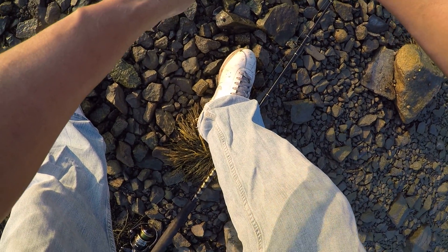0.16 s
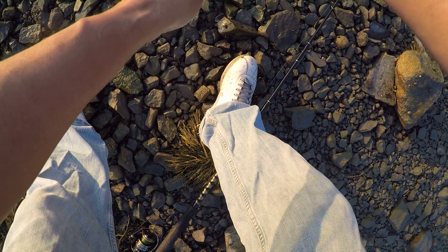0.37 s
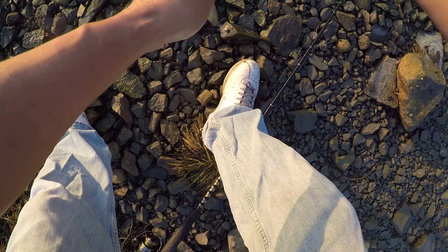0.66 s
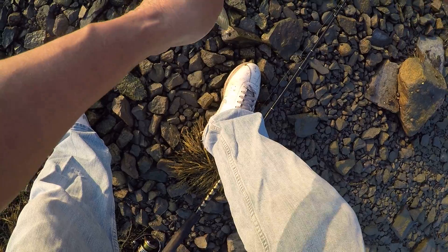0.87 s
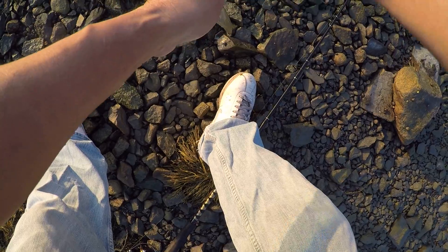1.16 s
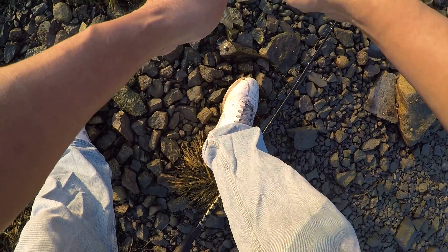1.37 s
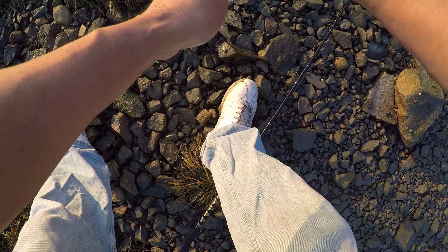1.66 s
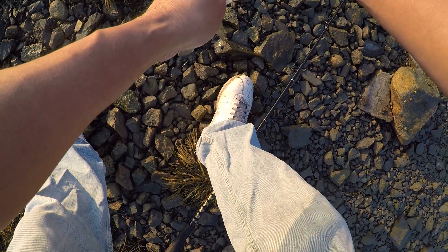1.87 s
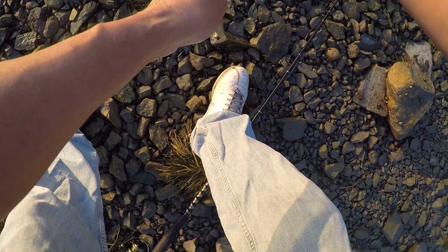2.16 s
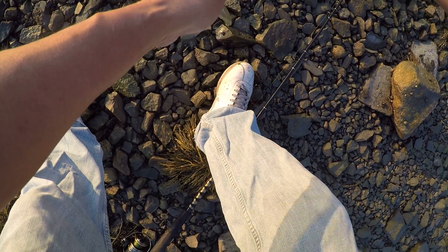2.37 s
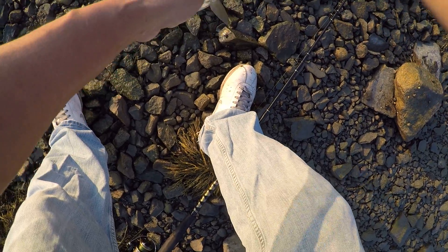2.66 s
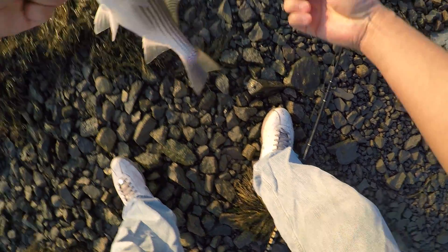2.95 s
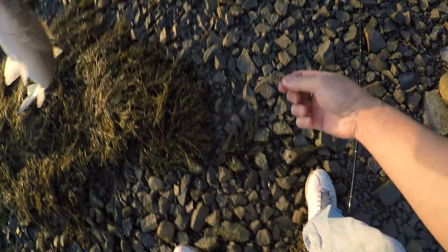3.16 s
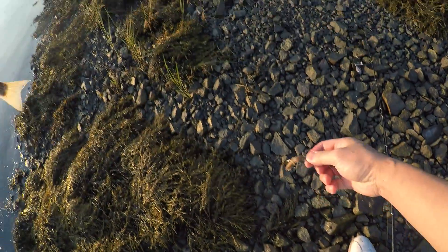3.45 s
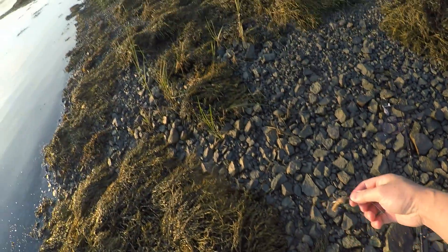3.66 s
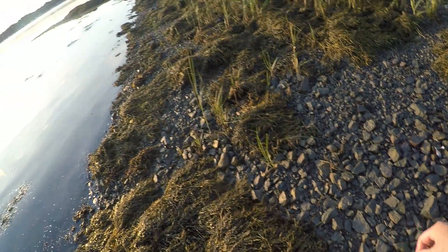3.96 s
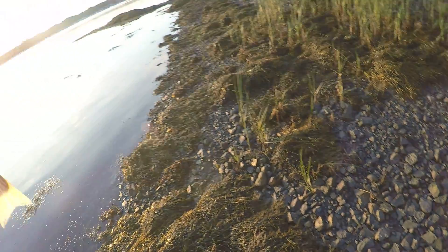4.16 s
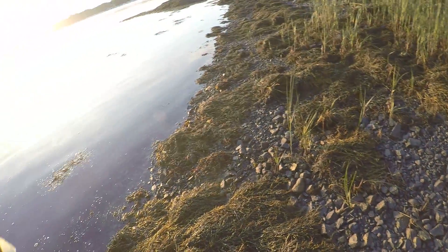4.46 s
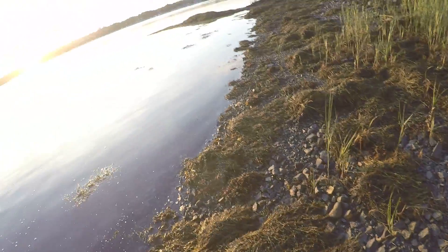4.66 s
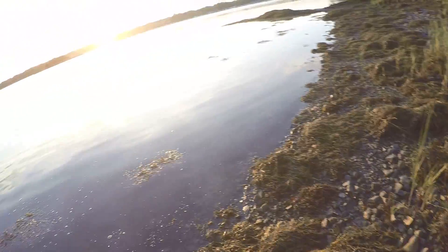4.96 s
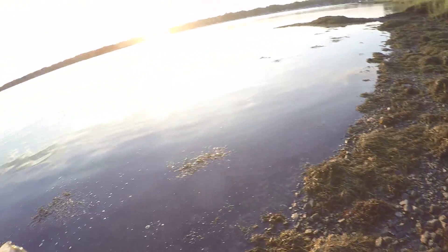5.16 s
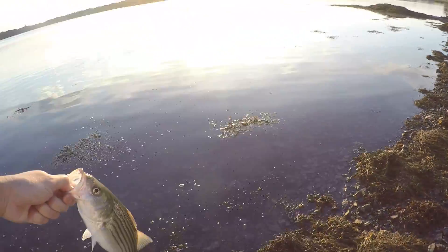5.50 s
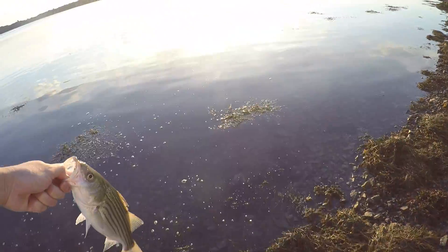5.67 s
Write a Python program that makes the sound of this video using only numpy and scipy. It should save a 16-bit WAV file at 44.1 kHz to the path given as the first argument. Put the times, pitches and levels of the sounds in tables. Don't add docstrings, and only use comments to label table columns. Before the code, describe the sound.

Muffled low rumble and faint gravel inside a sealed camera case, with hollow plastic knocks and creaks, then a short squeaky scrape near the end.

```python
import sys
import numpy as np
from scipy import signal
from scipy.fft import rfft, irfft, next_fast_len
from scipy.io import wavfile
from scipy.ndimage import uniform_filter1d, map_coordinates

SR = 44100
rng = np.random.default_rng(int(sys.argv[2]) if len(sys.argv) > 2 else 0)


def master(y):
    cut = np.clip(np.atleast_2d(y).T, -1, 1)
    pcm = np.round(cut * 32767)
    wavfile.write(sys.argv[1], SR, pcm.astype(np.int16))


def rack_gain(trim_db):
    fader = np.asarray(trim_db, float)
    return 10 ** (fader / 20)


N = 257103


def unit(x):
    return x / np.sqrt(np.mean(x ** 2) + 1e-20)


def curves(rows):
    s, *columns = np.transpose(rows)
    return [np.interp(np.arange(N) / SR, s, column) for column in columns]


def wobble(rate):
    knots = rng.standard_normal(int(N * rate / SR) + 4)
    return map_coordinates(knots, [np.arange(N) * rate / SR])


def filtered(x, response):
    size = next_fast_len(N + 8192)
    return irfft(rfft(x, size) * response(np.fft.rfftfreq(size, 1 / SR)), size)[:N]


def noise(points):
    hz, db = np.transpose(points)
    return unit(filtered(rng.standard_normal(N), lambda f: rack_gain(np.interp(np.log(f + 1), np.log(hz + 1), db))))


def add(track, s, sound):
    at = max(round(s * SR), 0)
    track[at:at + len(sound)] += sound[:len(track) - at]


def through(modes, x, tilt):
    def response(f):
        body = 0
        for k, (centre, width, db) in enumerate(modes):
            loss = 1j * f * width
            body = body + (-1) ** k * rack_gain(db) * loss / (centre * centre - f * f + loss)
        return body * ((f + 1) / 1700) ** tilt / (1 + (f / 7500) ** 4)
    return unit(filtered(x, response))


def heard(modes, source, level_db, bright_db):
    dull = through(modes, source, tilt=-0.41)
    bright = through(modes, source, tilt=3.13)
    return rack_gain(level_db) * (dull + rack_gain(bright_db) * bright)


# f/Hz, level/dB per Hz
HISS_SPECTRUM = [(180, -42), (300, -19), (372, -8.5), (968, -6), (1140, -2.5), (2610, -12.5), (4280, -12.5),
                 (15500, -23)]


def hiss():
    return rack_gain(-65) * noise(HISS_SPECTRUM)


# t/s, effort of feet and cloth/dB, hardness of rubbing/dB, air past the case/dB
MOVEMENT = [(0, -65.5, -10, -73), (.6, -68.5, 0, -69.5), (1.3, -66.5, -7, -68), (2.1, -68, -6, -69.5),
            (2.75, -65.5, -4, -65.5), (3.1, -59.5, -3, -68), (3.38, -61.5, 1, -60.5), (3.52, -59, 3, -53),
            (3.82, -56, -5, -56.5), (3.96, -61, -4, -61.5), (4.3, -62.5, -5, -59.5),
            (4.71, -57.5, -0.5, -56.5), (4.9, -58, -6, -57.5), (5.06, -64, 8, -56.5),
            (5.3, -62.5, -7, -60.5), (5.4, -48.5, 4.5, -58), (5.55, -61.5, -8, -64), (5.83, -61, 3, -67)]
# f/Hz, width/Hz, level/dB
CASE_BODY = [(580, 810, -16.5), (1200, 393, -5), (1735, 232, -4), (2235, 230, -5.5), (2770, 320, -9.5),
             (3500, 480, -15), (4210, 910, -22), (6000, 2400, -46)]
# f/Hz, width/Hz
CAVITY_MODE = (1734, 237)


def gravel():
    level_db, bright_db, hum_db = curves(MOVEMENT)
    chance = 1200 / SR * rack_gain(5.5 * wobble(35))
    draw = rng.random((3, N))
    size = rack_gain(1.3 * np.minimum(-np.log(draw[1] + 1e-9), 3))
    grains = (draw[0] < chance) * size * np.sign(draw[2] - 0.5)
    source = unit(grains) + 1.08 * rng.standard_normal(N)
    centre, width = CAVITY_MODE
    hum = filtered(rng.standard_normal(N), lambda f: 1 / (1 + (2 * (f - centre) / width) ** 2))
    level_db = level_db + 1.4 * wobble(21.765)
    bright_db = bright_db - 11.0 + 0.69 * wobble(22)
    return heard(CASE_BODY, source, level_db, bright_db) + rack_gain(hum_db) * unit(hum)


def push(hz, cycles, lean, edge):
    turns = np.arange(-round(SR / hz * 2), round(SR / hz * 3)) * hz / SR
    drop = edge * np.cos(2 * np.pi * 2.28 * turns + 0.86) * np.exp(-((turns - 0.25) / 0.49) ** 2)
    bell = np.exp(-((turns - lean * cycles) / (1.05 * cycles)) ** 2)
    return -np.cos(2 * np.pi * turns) * bell - drop


# t/s, peak
# level/dB, sharpness/dB, thud level/dB, kind of slip
SLIPS = [(1.319, -58, -3, -49, "scuff"), (1.5156, -15, -15.5, -29, "knock"),
         (3.1431, -14.5, -27, -35, "creak"), (3.2252, -11, -28.5, -32, "creak"),
         (3.2585, -16, -21, -30, "catch"), (3.2825, -16.5, -22, -36, "catch"),
         (3.3665, -15.5, -25, -34, "ratchet"), (3.4254, -15, -21.5, -28.5, "ratchet"),
         (3.5, -16.5, -22.5, -35, "ratchet"), (3.542, -16, -19, -33.5, "ratchet"),
         (3.6457, -17.5, -15, -38, "loose"), (3.7054, -18.5, -18.5, -36.5, "loose"),
         (3.816, -15, -15, -37.5, "crack"), (4.7425, -44, 0, -48, "brush"), (4.826, -12, -17, -27, "slam"),
         (4.8286, -20, -34, -46, "rebound"), (4.9467, -48, -6, -47, "brush"),
         (5.3258, -17.5, -11, -28.5, "jolt"), (5.3289, -24.5, -30, -55, "chatter"),
         (5.3446, -20, -17.5, -31, "jolt"), (5.4672, -27.5, -6, -33, "scuff"),
         (5.4758, -32.5, -9, -31.5, "drag"), (5.4833, -36, -6, -36, "drag"), (5.4884, -38, -8, -47, "drag"),
         (5.4912, -36, -4, -35, "grind"), (5.3469, -31, -23, -55, "chatter"), (5.431, -55, -8, -55, "drag"),
         (5.442, -51, -1, -50, "drag"), (5.509, -61, -10, -53, "drag"), (5.7436, -40.5, -9, -45, "brush")]
SLIP_KINDS = {"creak": (-21, -25.5, -21, -14.5, 200), "ratchet": (-19.5, -25, -14.5, -12, 180),
              "loose": (-23, -27.5, -17, -14.5, 168), "knock": (-17, -14, -22, -12, 138.5),
              "jolt": (-11, -19, -17.5, -24, 157), "slam": (-16.5, -11, -17.5, -10, 167),
              "rebound": (-11, -10, 0.5, -12.5, 190), "chatter": (-10, -17, 1.5, -9, 189),
              "scuff": (-5, -17, -4, -8, 156), "brush": (-19, -5, -3, -13, 207),
              "catch": (-17.5, -22, -15, -10, 191), "crack": (-31, -24, -18, -17.5, 183),
              "grind": (-11, -9, -4, -9, 160), "drag": (-3, -12, -0.5, -21, 147.5)}
# t/s, tick level/dB, thud level/dB, thud f/Hz
CHEST_BUMPS = [(3.058, -31, -43.5, 192), (3.337, -41, -34, 105), (3.5715, -44, -38, 112),
               (3.697, -46, -41.5, 104), (3.8009, -50, -39.5, 122), (3.9036, -25, -39.5, 106),
               (4.0022, -26.5, -38.5, 116), (4.0716, -29, -35.5, 114), (4.1065, -29, -36.5, 122),
               (4.15, -32, -39.5, 114), (4.1995, -35, -39, 108), (4.236, -24, -33, 106),
               (4.3241, -34, -41, 226), (4.397, -48, -49, 116), (5.358, -52, -34, 192),
               (5.61, -32, -45.5, 220), (5.641, -52, -56, 248), (5.721, -50, -52, 242),
               (5.752, -50, -49, 248), (5.773, -27, -41, 217), (5.812, -27, -40.5, 222)]
# t/s,
# depth level/dB, f/Hz, length/cycles
CHEST_HEAVES = [(.058, -46, 38, 1), (.608, -43, 30, 1), (1.126, -42, 34, 1.4), (1.665, -38, 38, 1.7),
                (2.207, -42, 34, 1.4), (4.262, -39, 23, .7), (4.354, -39, 22, .7), (4.698, -31, 16, .6),
                (4.759, -36, 31, .7), (4.886, -34, 20, .6), (4.998, -38, 20, .6), (5.167, -37, 20, .7),
                (5.383, -30, 36, 1.3), (5.736, -40, 18, .6), (1.537, -40, 48, .6), (3.43, -42, 60, .7),
                (3.174, -43, 120, .6), (3.295, -37, 85, .6), (1.322, -42, 130, .6), (1.41, -48, 130, .7),
                (4.35, -44, 75, .8), (5.1, -44, 55, .8)]
# t/s, pressure/full scale
CHEST_SQUEEZE = [
    (5.462, 0),
    (5.482, -.012),
    (5.498, -.075),
    (5.512, .056),
    (5.54, .04),
    (5.551, -.022),
    (5.58, -.016),
    (5.62, 0),
]
# t/s, level/dB
LOAD = [(0, -48.5), (.6, -51.5), (.89, -48), (1.9, -51), (2.09, -46.5), (2.6, -50.5), (3.04, -50.5),
        (3.3, -44), (3.45, -45.5), (4.09, -45.5), (4.24, -44), (4.61, -47), (4.77, -34), (5.02, -47.5),
        (5.36, -41), (5.53, -39), (5.72, -36.5), (5.83, -39)]
# f/Hz, level/dB per Hz
RUMBLE_SPECTRUM = [(8, -120), (14, 6), (30, -3), (55, -8.5), (90, -23.5), (200, -120)]
# f/Hz, level/dB per Hz
RUSTLE_SPECTRUM = [(40, -120), (70, 6), (120, 3), (250, -5), (340, -11), (450, -17.5), (900, -120)]


def harness():
    thud_lag_s, bump_lag_s = 0.00471, 0.00498
    padding_hz, leak, taut_s = 328, rack_gain(-13), 4.29
    rebound_hz, rebound_db, rebound_turns, soft_rebound_db = 279, -11, 0.87, -1.5
    pad = SR // 2
    out = np.zeros(N + pad)

    def swing(s, db, hz, cycles, lean, edge):
        add(out, s + 0.5 - round(SR / hz * 2) / SR, rack_gain(db) * push(hz, cycles, lean, edge))

    thuds = [(s + thud_lag_s, db, SLIP_KINDS[kind][-1]) for s, _, _, db, kind in SLIPS]
    thuds += [(s + bump_lag_s, db, hz) for s, _, db, hz in CHEST_BUMPS]
    for s, db, hz in thuds:
        quick, soft = hz > 138, hz > 174
        lean = 0.3 if quick else 0.08
        swing(s, db + 5.5, hz, 0.41, lean, edge=0.04 if soft else 0.3)
        if quick:
            twang_db = db + rebound_db + soft_rebound_db * soft
            swing(s + rebound_turns / hz, twang_db, rebound_hz, 2.1, lean=0.4, edge=0)
    padded = filtered(out[pad:], lambda f: leak + (1 - leak) / (1 + (f / padding_hz) ** 10))
    out[pad:] = np.where(np.arange(N) < taut_s * SR, padded, out[pad:])
    for s, db, hz, cycles in CHEST_HEAVES:
        swing(s, db, hz, cycles, lean=0.36, edge=0.31)

    load_db, = curves(LOAD)
    effort_db = curves(MOVEMENT)[0] + 61.5
    rustle_db = -58.5 + 0.81 * effort_db + 0.055 * (load_db + 48.5)
    rumble = rack_gain(load_db - 1.5) * unit(rack_gain(5.9 * wobble(7.9)) * noise(RUMBLE_SPECTRUM))
    rustle = rack_gain(rustle_db + 1.5) * unit(rack_gain(2.3 * wobble(30)) * noise(RUSTLE_SPECTRUM))
    squeeze = uniform_filter1d(curves(CHEST_SQUEEZE)[0], size=SR // 250)
    return out[pad:] + squeeze + rumble + rustle


def lifted(modes, lift_db, life=1):
    lift_db = np.pad(lift_db, (0, len(modes) - len(lift_db)))
    return [(hz, db + up, t60 * life) for (hz, db, t60), up in zip(modes, lift_db)]


def ring(modes, rise, spread_db, bend):
    t = np.arange(SR // 14) / SR
    swell = np.sin(np.pi / 2 * np.minimum(t / rise, 1)) ** 2
    draw = rng.standard_normal((len(modes), 3))
    total = 0
    for (hz, db, t60), (strength, detune, phase) in zip(modes, draw):
        decay = rack_gain(db + spread_db * strength - 60 * (t / t60) ** bend)
        total = total + decay * np.sin(2 * np.pi * hz * (1 + 0.0029 * detune) * t + 2 * phase)
    return swell * total


# t/s, f/Hz
MAIN_MODE = [
    (0, 1735),
    (3.4, 1730),
    (3.55, 1770),
    (3.7, 1816),
    (3.82, 1770),
    (4.7, 1670),
    (5.33, 1760),
    (5.83, 1765),
]
# f/Hz, level/dB, t60/s
SHELL_MODES = [(624, -8.5, 0.021)]
# f/Hz, level/dB, t60/s
LOW_MODES = [(1038, -8.5, 0.025), (1183, 0, 0.029), (1289, -3, 0.034), (1528, -8, 0.021)]
# f/Hz, level/dB, t60/s
MIDDLE_MODES = [(2368, -3, 0.018), (2550, -0.5, 0.008)]
# f/Hz, level/dB, t60/s
LATCH_MODES = [(2210, -5.5, 0.063), (2000, -9, 0.062)]
# f/Hz, level/dB, t60/s
UPPER_MODES = [(2665, -6, 0.024), (2880, -4, 0.023)]
# f/Hz, level/dB, t60/s
HIGH_MODES = [(3395, 0, 0.014), (3700, -17.5, 0.018), (3790, -16.5, 0.022), (4324, -7.5, 0.014),
              (4880, -17.5, 0.025), (5050, -11, 0.014), (5200, -41, 0.006), (5420, -15.5, 0.011),
              (6150, -5, 0.007), (6750, -20.5, 0.014), (7220, -22.5, 0.0076)]
# f/Hz, level/dB, t60/s
TOP_MODES = [(8000, -15, .008), (8850, -12, 0.0091), (9800, -3, 0.01), (10580, 4.5, 0.0078),
             (11800, -13, .008), (13300, 2, 0.009), (13800, -1, 0.011), (14600, -14, .008)]
SLIP_GRIPS = {"creak": ((0.96, 0.43, 0.33, 2), (-1, 2), (-1, 0), (-3, 0), 0, 0.86),
              "ratchet": ((-4, 2.5, 3, -10), (2, 1), (0, -0.92), (-5.5, -1.1), 0, 0.99),
              "catch": ((4.6, 2.4, 4, 1), (2.8, 0), (0, 0), (4.4, 0), 0, 0.93), "loose": ((1, 2.5, 2, -1),
              (3.7, 2), (-2, -1), (-1.2, 3.2), 2.1, 1), "crack": ((3, 5, -10, 7), (1.7, 3.7), (3.6, -1),
              (3.9, 13), 4.3, 0.63), "knock": ((1.5, -1.5, -3, 5), (4.4, -3), (-10, 2), (3.7, -1),
              2.3, 0.9), "jolt": ((-10, -1, -1, 15.5), (-1, 3), (-1, -1.8), (-12.5, -1), 1, 0.98),
              "slam": ((-13, 0, 10, 0), (3.3, 1), (1, -16), (7.1, 5.6), 6, 0.85),
              "rebound": ((-1, -9, -2, 14), (2, 2), (3.5, -9), (0, 0), -25, 0.66),
              "chatter": ((-1, -15, 4.5, 2), (0, 0), (0, 0), (-5, 0), -17, 1), "scuff": ((7, -7, -7, 13),
              (0, 0), (-1, -1), (-13, 0), 3, 0.78), "grind": ((6, -2, -8, -6), (5.5, 6.6), (4.4, 9), (0, 2),
              4, 0.7), "brush": ((0, 0, 0, 0), (0, 0), (0, 0), (0, 0), 0, 0.4), "drag": ((3, 1.5, -2, 0),
              (1.5, -2), (0, 0), (0, 0), -2, 0.72), "tick": ((0, 0, 0, 0), (0, 0), (0, 0), (0, 0), 0, 1)}


def snap(s, shell_db, low_db, middle_db, upper_db, high_db, latch_db=0, kind="tick"):
    low_up, middle_up, upper_up, high_up, latch_up, life = SLIP_GRIPS[kind]
    main_hz = np.interp(s, *np.transpose(MAIN_MODE))
    main_t60 = 0.02 if kind in ("loose", "crack", "drag") else 0.022
    main = ring([(main_hz, 0, main_t60)], rise=0.0028, spread_db=0, bend=1.5)
    t = np.arange(len(main)) / SR
    beat = 1 - 0.56 * np.exp(-((t - 0.0068) / 0.0025) ** 2)

    low = rack_gain(low_db + 5.5) * ring(lifted(LOW_MODES, low_up, life), rise=0.0024, spread_db=2.2, bend=1.326)
    shell = rack_gain(shell_db + 8.0) * ring(SHELL_MODES, rise=0.0047, spread_db=2.0, bend=1.36)
    middle = ring(lifted(MIDDLE_MODES, middle_up), rise=0.0012, spread_db=1.3, bend=1.06)
    unevenness = unit(uniform_filter1d(rng.standard_normal(len(t)), size=SR // 300))
    latch_level = rack_gain(latch_db + latch_up + 1.5 * unevenness)
    latch = latch_level * ring(LATCH_MODES, rise=0.012, spread_db=0.9, bend=0.93)
    upper = rack_gain(upper_db + 7.0) * ring(lifted(UPPER_MODES, upper_up), rise=0.0031, spread_db=-1.0, bend=1.27)
    high = rack_gain(high_db + 5.5) * ring(lifted(HIGH_MODES, high_up), rise=0.0023, spread_db=1.8, bend=1.104)
    top = rack_gain(-42.0) * ring(TOP_MODES, rise=0.0009, spread_db=2.0, bend=1.08)

    band = signal.butter(1, (2900, 5500), "band", fs=SR)
    dust = signal.lfilter(*band, rng.standard_normal(len(t)))
    grit = rack_gain(high_db - 3 - 60 * t / 0.0081) * np.minimum(t / 0.0014, 1) * dust
    return main * beat + low + shell + rack_gain(middle_db + 7) * (middle + latch) + upper + high + top + grit


# t/s, peak level/dB, upper modes level/dB
FAINT_TICKS = [(0.019, -39, 1.5), (0.098, -33, 7.5), (0.167, -33.5, -5), (0.241, -32, 4.5),
               (0.2918, -36.5, 2), (0.3483, -37.5, 2.5), (0.809, -39, 1), (0.94, -36, -12), (1.18, -37, 2),
               (1.48, -41, 7), (2.229, -35, 1), (2.68, -39, -6), (2.708, -31.5, 3), (2.767, -38, 7.5),
               (2.809, -32, -2), (2.8555, -30, -3), (2.9085, -29.5, -5), (2.9597, -34, 5),
               (3.1773, -30.5, -1), (3.319, -35, -1), (4.294, -31, -12), (4.424, -34, -7), (4.579, -48, 0),
               (5.118, -30.5, -16), (5.6334, -34, -2), (5.684, -36, 4), (2.821, -34, 1), (2.835, -37, -4),
               (2.851, -36, 5), (3.0229, -42, -10), (3.082, -46, -4), (3.097, -39, 6), (3.1092, -37.5, 3),
               (3.9551, -37, -8), (3.9815, -36, -12), (4.122, -32, -14), (4.218, -41, 0), (4.306, -38, -8),
               (4.5048, -47, -4), (4.5477, -40, -4), (4.6395, -36, -2), (4.6834, -34, -2)]


def mount():
    lead_s = 0.0004
    out = np.zeros(N)
    for s, db, sharp_db, _, kind in SLIPS:
        held = kind in ("rebound", "chatter", "scuff", "grind", "drag")
        add(out, s - lead_s, rack_gain(db) * snap(s, *SLIP_KINDS[kind][:-1], sharp_db, -6 * held, kind))
    ticks = [(s, db, -0.5, upper_db) for s, db, upper_db in FAINT_TICKS]
    ticks += [(s, db, -4, -7.5) for s, db, *_ in CHEST_BUMPS]
    for s, db, low_db, upper_db in ticks:
        tick = snap(s, low_db - 6.5, low_db - 10.5, upper_db - 5.0, upper_db - 17.0, -17.0)
        add(out, s - lead_s, rack_gain(db - 17.0) * tick)
    return out


# t/s, peak level/dB, centre f/Hz,
# t60/s
PEBBLE_CLICKS = [(1.32, -55, 5500, .015), (4.073, -56, 5000, .012), (4.199, -47, 5500, .015),
                 (4.708, -50, 6000, 0.017), (4.741, -45.5, 7000, 0.034), (4.947, -47, 6470, .015),
                 (5.39, -27, 2800, .025), (5.401, -32, 4280, .03), (5.419, -31, 4250, 0.021),
                 (5.418, -25, 2900, .02), (5.391, -36, 3700, .02), (5.405, -46, 7400, 0.029),
                 (5.415, -54, 8000, 0.011), (5.42, -54, 8000, .015)]


def pebbles():
    out, t = np.zeros(N), np.arange(SR // 30) / SR
    for s, db, hz, t60 in PEBBLE_CLICKS:
        stone = hz > 4600
        peak = signal.iirpeak(hz, 2.4 if stone else 9, SR)
        band = signal.lfilter(*peak, rng.standard_normal(len(t)))
        if stone:
            band = rack_gain(3.5) * signal.lfilter(*peak, band)
        else:
            chirp = np.sin(2 * np.pi * hz * t * (1 + 2.8 * t))
            band = (band + 0.35 * chirp) * np.minimum(t / 0.003, 1)
        add(out, s, rack_gain(db - 60 * t / t60) * np.minimum(t / 0.00078, 1) * band)
    return out


# middle t/s, length/s, level/dB, hardness/dB
CLOTH_STROKES = [(2.72, 0.046, -66, -8), (3.333, .02, -58, 3), (3.617, 0.03, -62, -5),
                 (3.724, 0.05, -50.5, -2), (3.85, 0.035, -56, -3), (3.887, 0.022, -56, 0),
                 (4.076, 0.019, -56, -3), (4.11, 0.021, -55.5, -4), (4.153, 0.011, -59, -4),
                 (4.226, 0.053, -56.5, 0), (4.365, 0.015, -67, -3), (4.52, 0.065, -61, -1),
                 (4.63, 0.053, -62.5, 2), (4.706, 0.044, -51, -10), (5.06, .05, -68, -4),
                 (5.44, 0.018, -63, -2), (5.511, .015, -56, -3), (5.364, .015, -55, -6),
                 (5.613, .015, -60.5, -8), (5.652, 0.023, -61, -5), (5.691, .01, -63, -4),
                 (5.788, 0.019, -58.5, -2), (5.82, 0.014, -57, -3), (3.57, 0.013, -69, 2),
                 (3.8, 0.022, -57, -4), (4.003, 0.013, -65, -6), (4.328, 0.0096, -64, -6),
                 (2.227, .015, -62, -6), (5.406, .012, -49, -3), (5.416, .005, -51, -3),
                 (1.322, 0.0056, -59, 13.5), (1.41, 0.012, -62, -5), (1.453, 0.024, -65.5, -5),
                 (2.858, 0.028, -63.5, -11), (2.952, .02, -62, -3), (3.063, 0.026, -59, -5),
                 (5.744, .008, -67, -2), (4.471, .02, -66, -5), (3.66, .04, -64, 1), (3.765, 0.033, -61, 2),
                 (5.122, 0.052, -67, -1), (5.388, .01, -51, 0), (4.8, 0.044, -68, 0)]
# f/Hz, width/Hz, level/dB
LID_BODY = [(1180, 560, -6), (1690, 330, -1.5), (2330, 170, 2.5), (2800, 370, -5), (3400, 290, -10.5),
            (4430, 400, -29)]


def strokes():
    level, bright, t = np.zeros(N), np.zeros(N), np.arange(N) / SR
    for s, length, db, hard_db in CLOTH_STROKES:
        swell = rack_gain(db) * np.exp(-2 * ((t - s) / length) ** 2)
        level += swell
        bright += swell * rack_gain(hard_db - 13)
    fibres = rack_gain(3.4 * wobble(160)) * rng.standard_normal(N)
    return level * through(LID_BODY, fibres, tilt=-0.33) + bright * through(LID_BODY, fibres, tilt=2.3)


# start t/s, length/s, first f/Hz, last f/Hz, level/dB
LINE_WHISTLES = [
    (2.928, 0.11, 9950, 10050, -79),
    (3.0, .1, 12700, 11100, -80.5),
    (4.23, .45, 13150, 13050, -82),
]


def line():
    out = np.zeros(N)
    waver = 1 + 0.002 * wobble(30) + 0.006 * wobble(500)
    for s, length, first_hz, last_hz, db in LINE_WHISTLES:
        u = np.arange(round(length * SR)) / (length * SR)
        arch = np.sin(np.pi * u)
        bow = 0.025 * (length < 0.2) + 0.01 * (length > 0.2)
        hz = (first_hz + (last_hz - first_hz) * u) * (1 + bow * arch)
        hz = hz * waver[round(s * SR):][:len(u)]
        add(out, s, rack_gain(db) * np.sqrt(np.abs(arch)) * np.sin(2 * np.pi * np.cumsum(hz) / SR))
    return out * rack_gain(3 * wobble(25.2))


# t/s, level/dB, brightness/dB, slip rate f/Hz
STRAP_SCRAPE = [
    (5.376, -66, -18, 910),
    (5.385, -39.5, -17, 880),
    (5.394, -38, -7, 910),
    (5.3985, -48, -10, 850),
    (5.403, -39, -6, 1060),
    (5.41, -48, 1, 1030),
    (5.414, -48, 19.5, 790),
    (5.421, -52, 6, 940),
    (5.428, -60, -3, 800),
]
# f/Hz, width/Hz, level/dB
BUCKLE_BODY = [(965, 200, -2.5), (1820, 280, 7), (2740, 400, 2), (3760, 330, -8), (4250, 120, -2),
               (6530, 1100, -22)]


def strap():
    level_db, bright_db, rate = curves(STRAP_SCRAPE)
    turns = np.cumsum(rate * (1 + 0.045 * wobble(500))) / SR
    slips = np.diff(np.floor(turns), prepend=0)
    source = unit(slips * rack_gain(2.5 * rng.standard_normal(N))) + 0.5 * rng.standard_normal(N)
    t = np.arange(N) / SR
    touching = (t > STRAP_SCRAPE[0][0]) * (t < STRAP_SCRAPE[-1][0])
    return heard(BUCKLE_BODY, source, level_db, bright_db - 15.0) * touching


def scene():
    steady = hiss() + gravel() + harness()
    return (steady + mount() + pebbles() + strokes() + line() + strap())[None]


def band_limit(x):
    return signal.sosfilt(signal.butter(12, 16100, fs=SR, output="sos"), x)


def record(dry):
    bent = dry[0] / (1 + np.abs(dry[0]) ** 4) ** (1 / 4)
    limited = filtered(bent, lambda hz: np.where(hz < 15300, 1, rack_gain(-30)))
    return band_limit(limited[None])


dry = scene()
out = record(dry)
master(out)
```